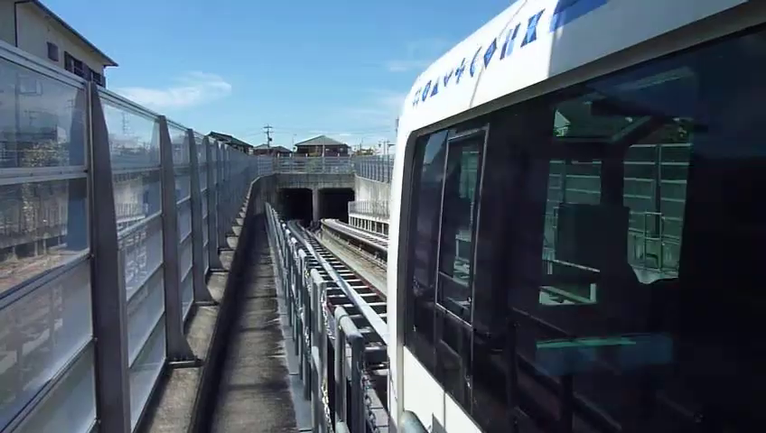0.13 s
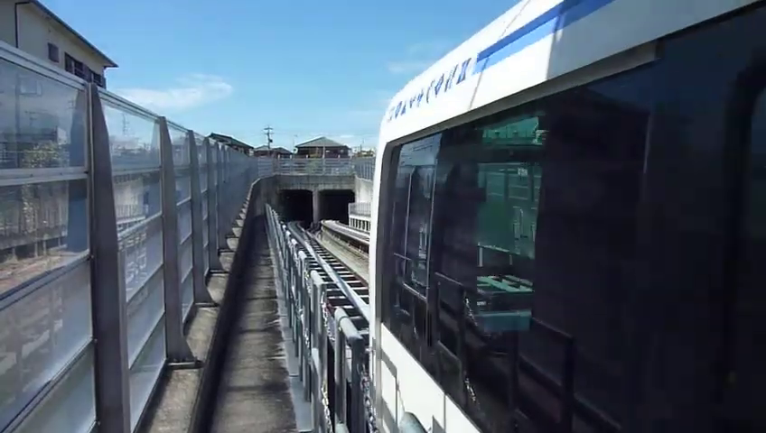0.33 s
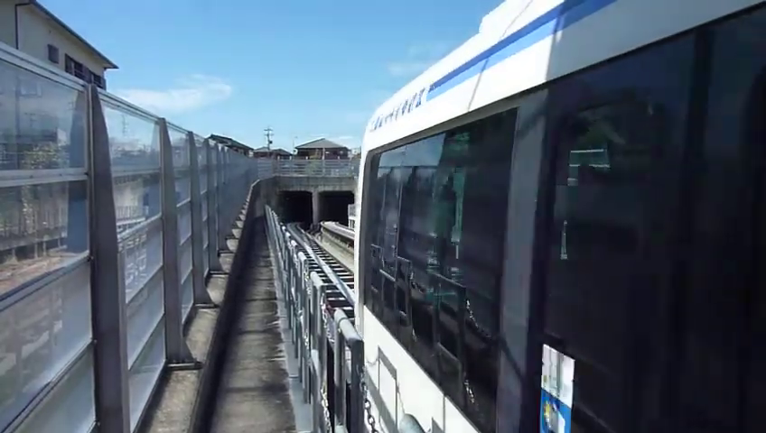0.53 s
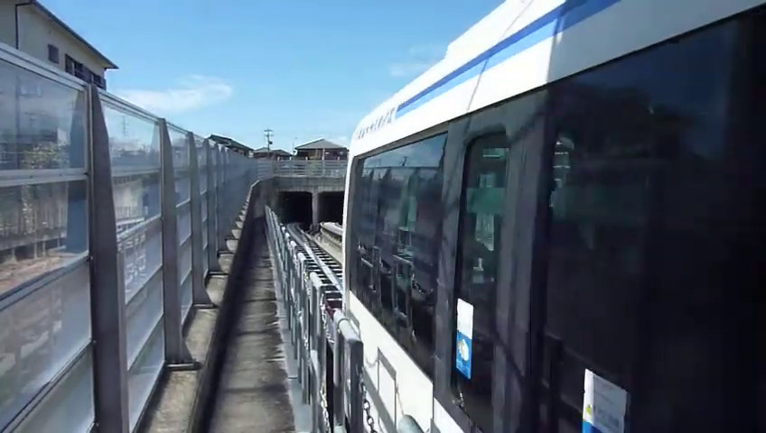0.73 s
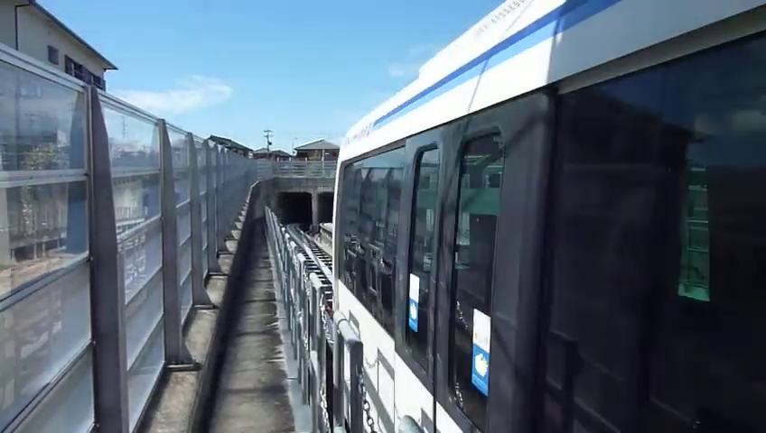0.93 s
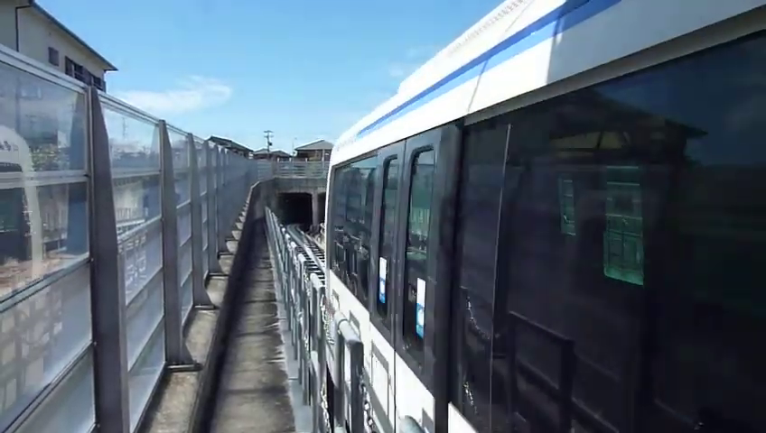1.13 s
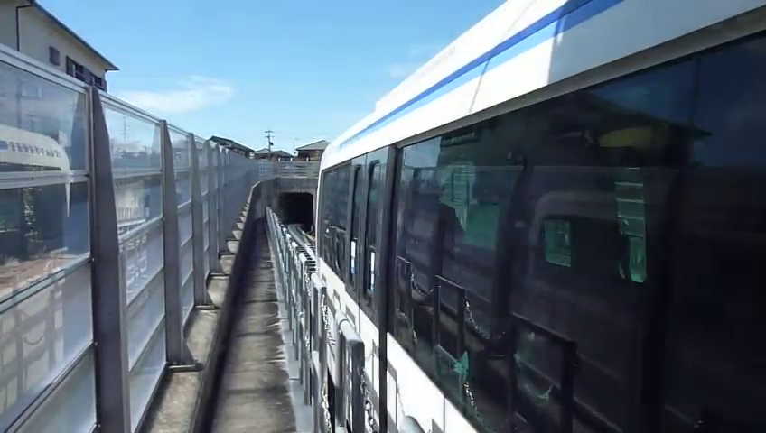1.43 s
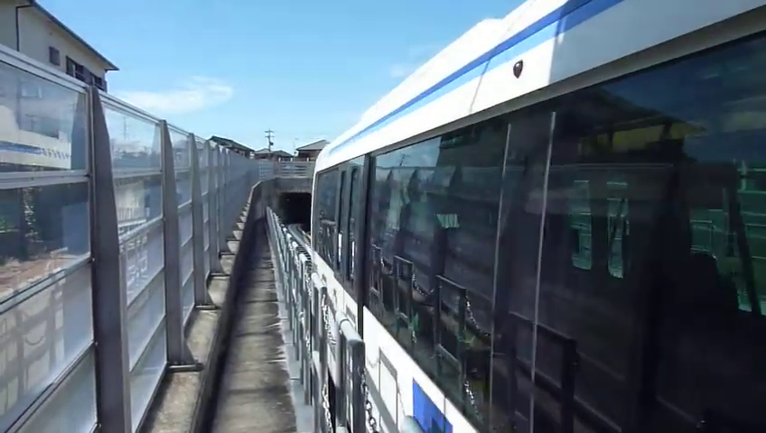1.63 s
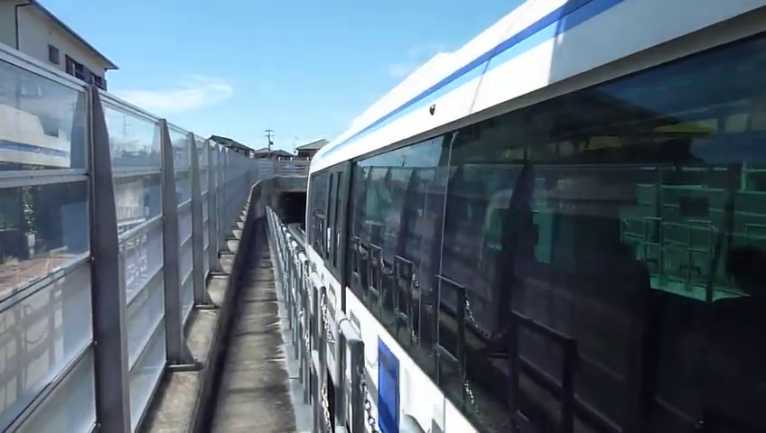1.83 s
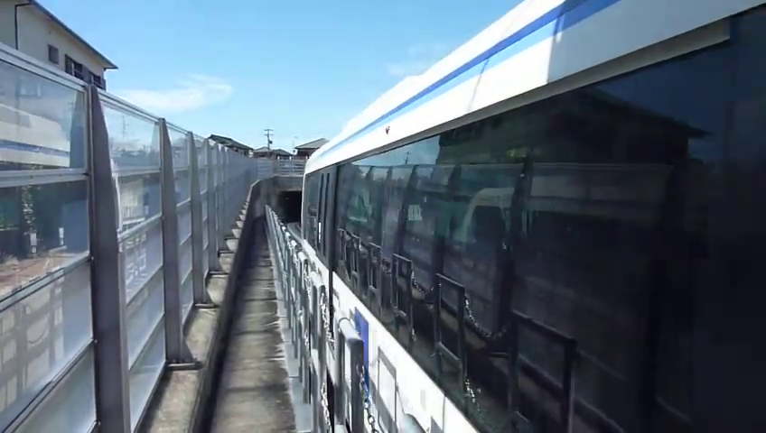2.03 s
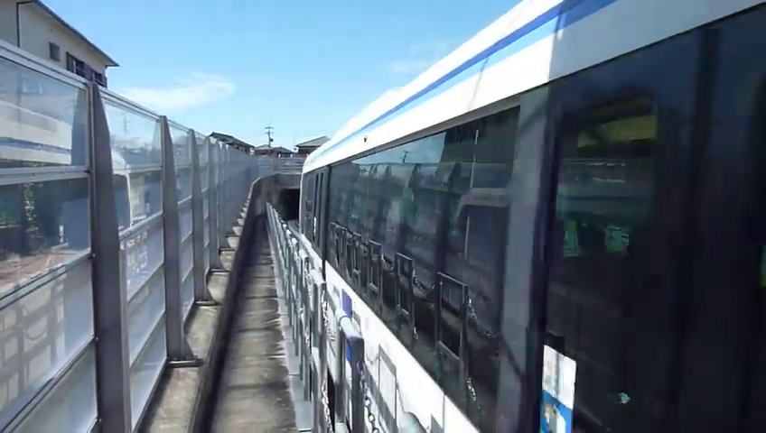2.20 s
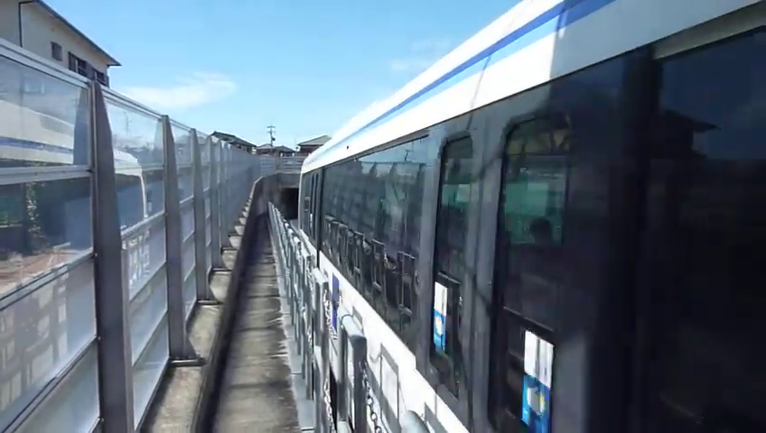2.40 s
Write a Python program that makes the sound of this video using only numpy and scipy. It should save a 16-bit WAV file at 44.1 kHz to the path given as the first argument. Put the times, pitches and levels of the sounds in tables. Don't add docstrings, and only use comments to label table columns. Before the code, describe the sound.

A levitated train passes close to a platform end between noise walls, a steady airy rush with a high electric whine and low beam hum; later a sinking tone passes, heard on a small dull camera microphone.

```python
import sys
import numpy as np
from scipy import signal
from scipy.fft import rfft, irfft
from scipy.io import wavfile

SR = 44100
rng = np.random.default_rng(int(sys.argv[2]) if len(sys.argv) > 2 else 0)


def store_pcm(level_fs):
    pcm = np.round(np.clip(level_fs, -1, 1) * 32767).astype(np.int16)
    wavfile.write(sys.argv[1], SR, np.atleast_2d(pcm).T)


def decibels_to_gain(level_db):
    exponent = np.asarray(level_db, float) / 20
    return 10 ** exponent


N = 112896


def at_hz(points, hz):
    table_hz, value = np.transpose(points)
    return np.interp(np.log(hz + 1), np.log(table_hz), value)


def drift(rate_hz, count=1):
    pole = np.exp(-40 * np.pi * rate_hz / SR)
    white = rng.standard_normal((count, N // 20 + 3002))
    slow = signal.lfilter([1], [1, -2 * pole, pole * pole], white)[:, 3000:]
    slow = slow / np.sqrt(np.mean(slow ** 2))
    return np.array([np.interp(np.arange(N) / 20, np.arange(len(row)), row) for row in slow])


def blurred_line(hz, width_hz):
    phase = 2 * np.pi * np.cumsum(hz + np.zeros(N)) / SR
    wander = drift(width_hz, count=4)
    return wander[:2] * np.cos(phase) + wander[2:] * np.sin(phase)


def rush(vigour_db, patchy_db, brighten):
    # f/Hz, level/dB per Hz
    rush_colour = [(30, -21), (90, -9.5), (200, -1.5), (650, -7), (1400, -12.5), (2500, -27.5),
                   (5200, -31.5), (7500, -41)]
    band_edges = 22 * 2 ** np.arange(0, 8.7, .4)
    together = drift(4.0)[0]
    white = rng.standard_normal((2, 2, N))
    out = 0
    for k, (low, high) in enumerate(zip(band_edges, band_edges[1:])):
        band_filter = signal.butter(2, [low, high], "band", fs=SR, output="sos")
        band = signal.sosfilt(band_filter, white[k % 2])
        hz = np.sqrt(low * high)
        follows = np.clip(1 - brighten * np.log2(hz / 200), 0, 1.5)
        flicker_db = patchy_db * (.5 * together + drift(9.0)[0])
        out = out + band * decibels_to_gain(at_hz(rush_colour, hz) + follows * vigour_db + flicker_db)
    return decibels_to_gain(-7.5) * out


def beam(vigour_db):
    # f/Hz, width/Hz, level/dB, growth/dB per s
    beam_modes = [(132, 17.5, -39, -3.5), (196.5, 23, -39, 5.5), (249.6, 24, -37.5, 1.3),
                  (600, 250, -38.5, -3.5)]
    t = np.arange(N) / SR - 1.3
    out = 0
    for hz, width_hz, db, grow_db in beam_modes:
        out = out + decibels_to_gain(db + grow_db * t + vigour_db) * blurred_line(hz, width_hz / 2)
    return out


def ticks():
    # t/s, peak level/dB
    near_ticks = [
        (2.4265, -22),
        (2.4835, -24),
    ]
    t60_s = .035
    t, noise = np.arange(N) / SR, rng.standard_normal(N)
    shape = sum(decibels_to_gain(db - 60 * np.abs(t - s) / t60_s) * (t >= s) for s, db in near_ticks)
    tick_filter = signal.butter(1, [900, 3000], "band", fs=SR, output="sos")
    return signal.sosfilt(tick_filter, noise * shape) * np.array([[1.15], [-.85]])


def tone():
    # t/s, f/Hz, third-partial level/dB, upper-partial level/dB
    tone_pass = [
        (1.55, 508, -25, -20),
        (1.66, 507, -11, 3),
        (1.78, 507, -2, 1),
        (1.9, 503, -2, -4),
        (2.0, 497, 5, -12),
        (2.1, 490, 3, -3),
        (2.24, 484, 0, -2),
        (2.37, 483, -7, -2),
        (2.56, 484, -2, -3),
    ]
    # multiple of its pitch, early level/dB, late level/dB
    tone_partials = [(3, -39, -39), (5, -47, -48), (7, -66, -57), (9, -67, -55), (13, -76, -65),
                     (14, -76, -62)]
    s, pitch_hz, low_db, upper_db = np.transpose(tone_pass)
    t = np.arange(N) / SR
    hz = np.interp(t, s, pitch_hz)
    low_db, upper_db = (np.interp(t, s, db, left=-90) for db in (low_db, upper_db))
    late = .5 + .5 * np.tanh((t - 2.1) / 0.18)
    phase = 2 * np.pi * np.cumsum(hz) / SR
    out = 0
    for k, early_level, late_level in tone_partials:
        pass_db = low_db if k == 3 else upper_db
        level_db = pass_db + early_level + (late_level - early_level) * late
        fading = decibels_to_gain(3.0 * drift(22.0, count=2))
        steady = fading * np.sin(k * phase + rng.uniform(0, 5.2, (2, 1)))
        out = out + decibels_to_gain(level_db) * (steady + 0.58 * blurred_line(k * hz, 9.0))
    return out


def whine(vigour_db):
    # carrier multiple, drive multiple, lower level/dB, upper level/dB, width/Hz
    whine_lines = [(2, 0, -33.5, -35, 7.4), (2, 1, -32, -38.5, 26.3), (2, 2, -39, -37.5, 11.1),
                   (3, 0, -40.5, -46, 28), (3, 2, -48.5, -44.5, 20.0), (3, 4, -43.5, -47.5, 29),
                   (3, 6, -57, -56, 50), (4, 0, -54, -52, 48), (4, 2, -49.5, -49, 22),
                   (4, 5, -57.5, -63, 19), (5, 2, -54, -64.5, 70), (5, 6, -57, -53.5, 100),
                   (6, 1, -53.5, -71, 140), (6, 5, -66.5, -64, 60.0)]
    t = np.arange(N) / SR
    drive_hz = 19.5 + 4.8 * t
    carrier_hz = 1003.5 + 1.0 * drift(5.0)[0]
    dulling_db_per_s = 1.6
    out = 0
    for k, m, lower_db, upper_db, width_hz in whine_lines:
        shift_db = dulling_db_per_s * (k - 2) * (m - 3) / 3 * (t - 1.3)
        sides = [(-1, lower_db), (1, upper_db)] if m else [(-1, lower_db)]
        for sign, db in sides:
            out = out + decibels_to_gain(db + shift_db) * blurred_line(k * carrier_hz + sign * m * drive_hz, width_hz)
    swell_db = 0.75 * drift(1.4)[0]
    return out * decibels_to_gain(vigour_db + swell_db)


def spread(pair):
    # f/Hz, level/dB
    side_width = [(60, -22.5), (120, -43.5), (240, -45.5), (490, -34), (990, -21), (1990, -11.5),
                  (4000, -5.5), (8050, -0.5)]
    # f/Hz, level/dB
    left_lean = [(60, 0.14), (500, -0.1), (1500, 0.5), (2700, 2.5), (4700, -0.5), (8000, 1.5)]
    hz = np.fft.rfftfreq(N, 1 / SR)
    mid, side = rfft(pair)
    side = side * decibels_to_gain(at_hz(side_width, hz))
    lean = decibels_to_gain(at_hz(left_lean, hz) / 2)
    return irfft(np.array([(mid + side) * lean, (mid - side) / lean]), N)


def scene():
    # t/s, rush level/dB, whine level/dB
    train_pass = [(0.091, -27.5, -0.8), (.35, -26, -1.9), (.6, -26.5, -1.9), (.9, -25, -1.5),
                  (1.051, -24, .5), (1.25, -23.5, -0.7), (1.42, -26.5, -2), (1.602, -23.5, 1),
                  (1.69, -25.5, -0.5), (1.771, -24, -1.5), (1.869, -22.5, 0.5), (2.02, -25.5, -1.5),
                  (2.15, -24, 0), (2.3, -25.5, -0.5), (2.45, -25.5, 2), (2.56, -24.5, -1)]
    t = np.arange(N) / SR
    s, rush_db, whine_db = np.transpose(train_pass)
    vigour_db, whine_db = np.interp(t, s, rush_db + 25), np.interp(t, s, whine_db)
    train = rush(vigour_db, patchy_db=1.0, brighten=.2) + beam(vigour_db) + tone() + whine(whine_db)
    return spread(train) + ticks()


def band_limit(x):
    return signal.sosfilt(signal.butter(12, 8870, fs=SR, output="sos"), x)


def record(dry):
    # low f/Hz, high f/Hz, level/dB, dropout threshold
    image_bands = [(8000, 8320, 0, -1.4), (8320, 8600, -11, -.3), (8600, 8850, -20, .7)]
    half_rate_hz = 8000
    hz, t = np.fft.rfftfreq(N, 1 / SR), np.arange(N) / SR
    from_notch = (hz - 5432) ** 2
    notch = np.sqrt((from_notch + 12 ** 2) / (from_notch + 370 ** 2))
    edge = np.clip((7905 - hz) / 520, 0, 1)
    x = irfft(rfft(dry) * notch * edge, N)
    mirror = rfft(2 * x * np.cos(4 * np.pi * half_rate_hz * t))
    flicker = drift(12.0)[0]
    for low, high, db, gate in image_bands:
        image = irfft(mirror * (hz > low) * (hz <= high), N)
        x = x + decibels_to_gain(-4 + db) * image * np.clip(3 * (flicker - gate), 0, 1)
    idle_tone = decibels_to_gain(-72 + 3 * drift(4.0)[0]) * blurred_line(half_rate_hz, 17.0)
    x = x + idle_tone - .0015
    return band_limit(x * (t > .0724))


dry = scene()
out = record(dry)
store_pcm(out)
```